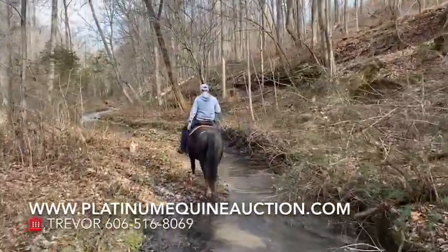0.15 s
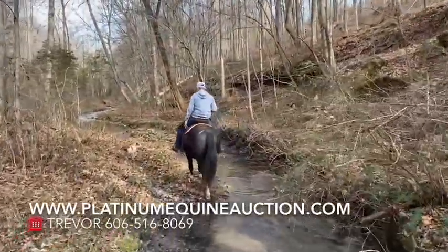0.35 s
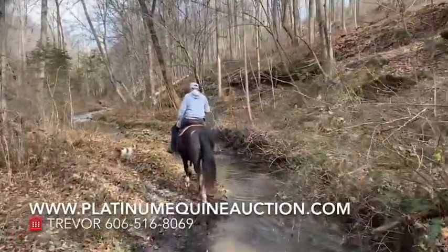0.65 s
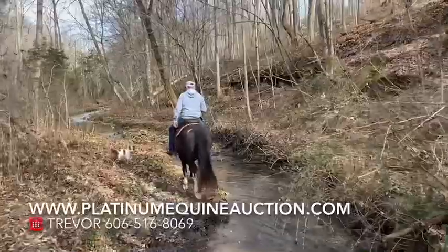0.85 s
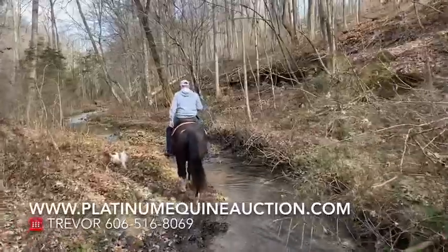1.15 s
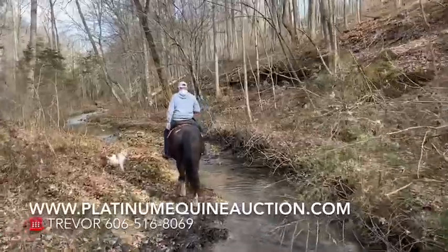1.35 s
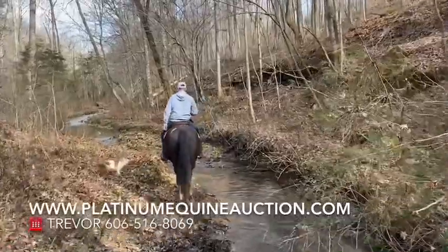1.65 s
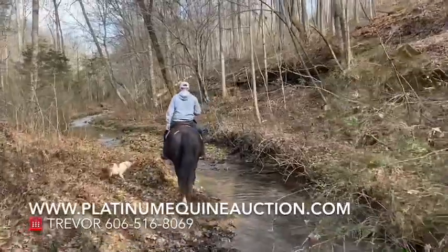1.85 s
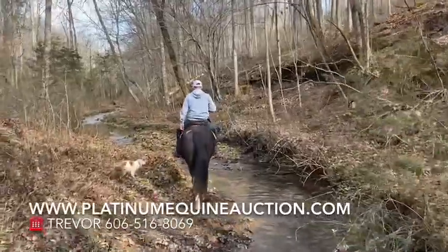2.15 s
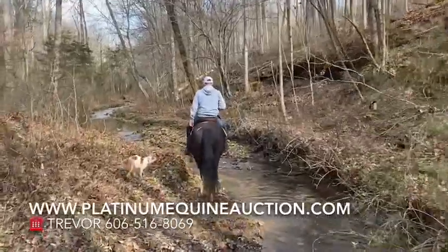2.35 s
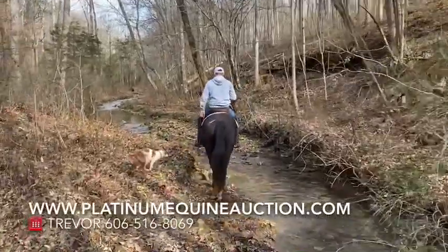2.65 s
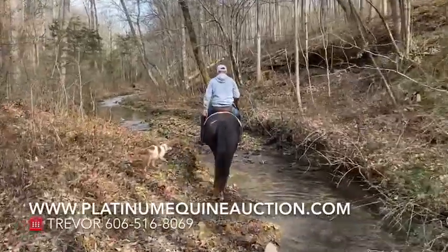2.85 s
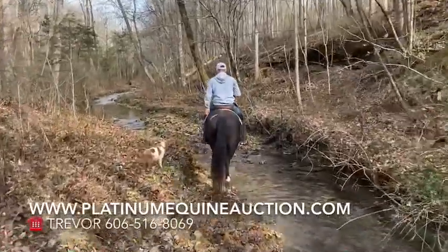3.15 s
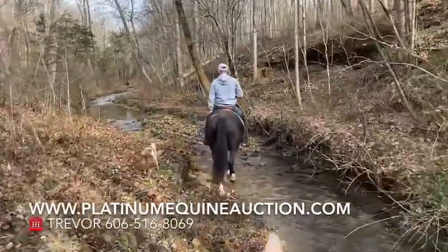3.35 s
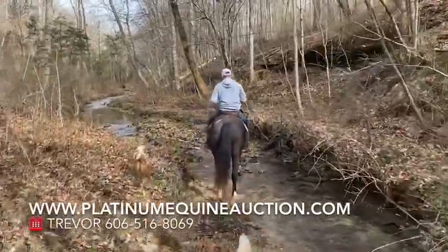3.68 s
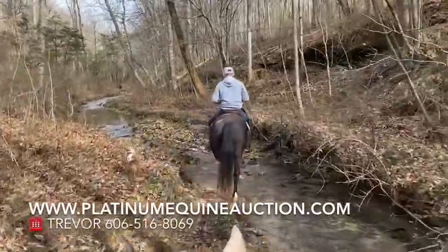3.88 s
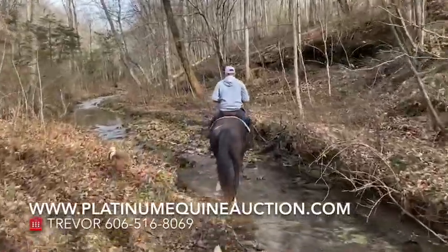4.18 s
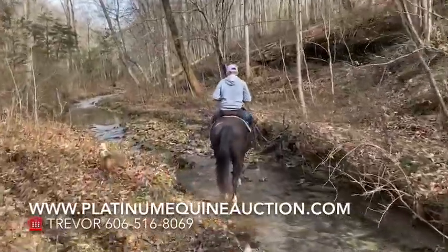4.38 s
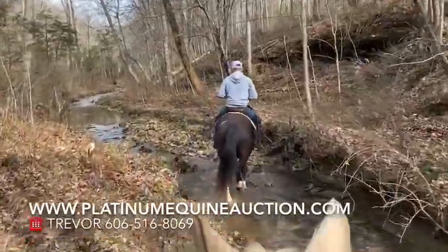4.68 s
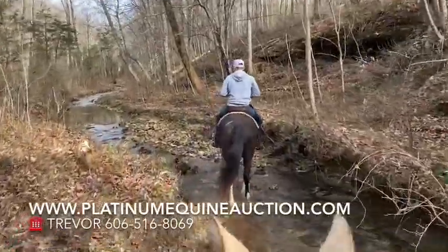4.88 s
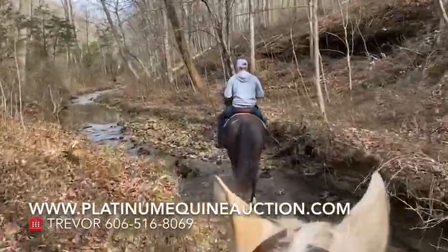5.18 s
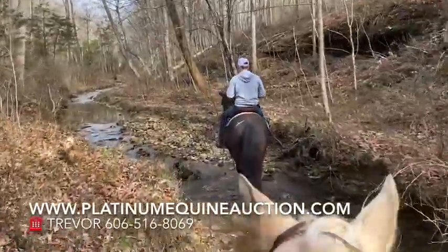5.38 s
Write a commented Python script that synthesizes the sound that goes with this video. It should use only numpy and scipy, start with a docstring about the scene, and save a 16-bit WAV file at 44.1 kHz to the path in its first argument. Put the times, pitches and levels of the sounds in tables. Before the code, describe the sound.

Horse hooves walk through a shallow creek, slapping, sloshing and gulping in the water, with droplets pinging and a faint distant engine drone.

```python
"""A shallow creek in bare woods: horses walk up it, heard from the saddle of the rear one.
Hooves slap the surface in noise and rings, trap air that gulps in gliding tones and thud on the bed.
Droplets ping; noise and bubble grains make the churning water, its spray and the current.
Low noise rumbles in the valley, where a far engine, one wavering tone, drones and sinks in pitch."""
import sys
import numpy as np
from scipy import signal
from scipy.fft import rfft, irfft, next_fast_len
from scipy.io import wavfile
from scipy.ndimage import map_coordinates

SR = 44100
rng = np.random.default_rng(int(sys.argv[2]) if len(sys.argv) > 2 else 0)


def waveform_to_disk(signal):
    """Save audio, clipped to [-1, 1], as 16-bit WAV at the path in sys.argv[1]."""
    frames = np.transpose(np.atleast_2d(signal))
    scaled = np.clip(frames, -1, 1) * 32767
    samples = np.round(scaled).astype(np.int16)
    wavfile.write(sys.argv[1], SR, samples)


N = 243431


def amp(db):
    """Amplitude of a level in dB."""
    return 10 ** (np.asarray(db) / 20)


def unit(x):
    """The signal scaled to rms 1."""
    return x / np.sqrt(np.mean(x ** 2) + 1e-20)


def along(points, hz):
    """Interpolates (Hz, value) points on a log frequency axis."""
    f, v = np.transpose(points)
    return np.interp(np.log(hz + 1), np.log(f + 1), v)


def curves(rows):
    """One value per sample for each column after the time."""
    s, *cols = np.transpose(rows)
    return [np.interp(np.arange(N) / SR, s, c) for c in cols]


def wobble(rate):
    """A smooth random curve, rate knots a second."""
    knots = rng.standard_normal(int(N * rate / SR) + 4)
    return map_coordinates(knots, [np.arange(N) * rate / SR])


def filtered(x, response):
    """Multiplies the spectrum of x by a response of frequency, complex where phase turns."""
    m = next_fast_len(N + SR // 2)
    return irfft(rfft(x, m) * response(np.fft.rfftfreq(m, 1 / SR)), m)[..., :N]


def add(track, s, sound):
    """Mixes a sound into the track from time s."""
    part = track[max(round(s * SR), 0):][:len(sound)]
    part += sound[:len(part)]


def band_noise(hz, octaves, size):
    """A short stretch of noise centred on hz; rms 1."""
    f = np.fft.rfftfreq(size, 1 / SR) + 1
    bell = np.exp(-.5 * (np.log2(f / hz) / octaves) ** 2)
    return unit(irfft(rfft(rng.standard_normal(size)) * bell, size))


def grains(count, mid_hz, octaves, cycles, spread_db, size):
    """Scattered short damped sines whose pitch rises a little, as bubbles do; rms 1."""
    place = rng.random(count)
    pitch_spread = rng.standard_normal(count)
    strength = np.minimum(rng.exponential(size=count), 4.5)
    hz = np.clip(mid_hz * 2 ** (octaves * pitch_spread), 100, SR / 3)[:, None]
    turns = hz * np.arange(size) / SR
    wave = np.sin(2 * np.pi * turns * (1 + 0.06654 * turns / cycles))
    wave *= turns * np.exp(-2.5 * turns / cycles)
    wave *= np.hanning(2 * size)[size:]  # fades to nothing at the grain's end
    wave *= amp(spread_db * strength)[:, None] * np.sqrt(hz)
    at = (place * N).astype(int)[:, None] + np.arange(size)
    return unit(np.bincount(at.ravel(), wave.ravel(), N + size)[:N])


def spread(pair, spectrum):
    """Colours two unrelated signals and mixes them into left and right of the given likeness; rms 1."""
    # Likeness of left and right: frequency_hz, correlation (1 = the same)
    likeness = [(100, 1), (300, 0.9733), (700, 0.7512), (1400, 0.2795), (3000, 0.9112), (5500, 0.8821),
                (9000, 0.84)]

    def response(hz):
        turn = np.arccos(np.clip(along(likeness, hz), -1, 1)) / 2
        return amp(along(spectrum, hz)) * [np.cos(turn), np.sin(turn)]

    mid, side = filtered(pair, response)
    return unit(np.array([mid + side, mid - side]))


def swell(s, db, rise_s, fall_s):
    """Power of an event that climbs to its peak and sinks, 10 dB in each given time (sign ignored)."""
    t = np.arange(N) / SR - s
    return amp(db - 10 * np.where(t < 0, -t / abs(rise_s), t / abs(fall_s))) ** 2


def effort():
    """Gains of gurgle, slosh and spray: the events add their power to the level between them."""
    # Water churning between heaves: time_s, gurgle_db, slosh_db
    churn = [(0, -51.5, -50.5), (1.38, -46, -50), (1.44, -45, -44), (1.58, -54, -50), (1.74, -49.5, -37),
             (1.94, -60.5, -47.5), (3.18, -51, -56.5), (3.28, -40, -46), (3.45, -49, -53.5),
             (3.7, -54, -57), (3.78, -40, -48), (3.95, -47.5, -54), (4.12, -59.5, -61.5), (4.38, -45, -56),
             (4.45, -47, -52.5), (4.55, -51.5, -52.5), (5.46, -54, -57), (5.52, -52, -54)]
    # Heaves round a leg: peak_s, gurgle_db, slosh_db, rise_s and fall_s (each per 10 dB, sign ignored)
    heaves = [(0.0, -49.5, -33.5, .1, 0.0616), (0.18, -40.5, -61.5, 0.527, -0.0275),
              (0.28, -25, -31.5, 0.0101, 0.03), (0.49, -38.5, -47.5, 0.1493, 0.1754),
              (0.58, -45.5, -37.5, 0.3575, 0.1253), (0.859, -36.5, -36.5, 0.1344, 0.0137),
              (1.105, -41.5, -48.5, 0.1658, 0.1424), (1.229, -33, -31.5, 0.0487, 0.0029),
              (1.425, -29.5, -34.5, 0.0398, 0.0153), (1.689, -39, -35, 0.08, 0.04),
              (1.89, -44.5, -48.5, 0.2087, 0.2185), (2.005, -32.5, -38, -0.0019, 0.0333),
              (2.078, -40.5, -38, 0.0883, 0.0423), (2.27, -37, -38.5, 0.0665, .04),
              (2.432, -40, -33.5, 0.1069, 0.0143), (2.54, -39.5, -40.5, 0.0148, 0.3741),
              (2.801, -48.5, -38.5, -0.1036, 0.1231), (2.885, -38, -43.5, 0.0157, 0.0791),
              (3.2, -40.5, -43, 0.0928, 0.0632), (3.252, -33.5, -52.5, 0.0109, -0.0064),
              (3.43, -45, -35.5, 0.0326, 0.0741), (3.335, -40, -41, 0.03, 0.03),
              (3.49, -42.5, -54.5, 0.1905, 0.0054), (3.602, -38, -33.5, 0.0451, 0.0972),
              (4.071, -38, -45.5, 0.14, 0.0187), (4.17, -43, -40.5, 0.0695, 0.0807),
              (4.33, -40, -43, 0.0479, 0.1045), (4.398, -36, -52.5, 0.0218, 0.0164),
              (4.567, -40, -44, 0.0622, 0.0164), (4.724, -38.5, -37, 0.0428, 0.058),
              (4.77, -42.5, -46, 0.0296, 0.2541), (5.145, -39, -42.5, 0.0514, 0.1276),
              (5.408, -31, -35, 0.016, 0.016)]
    # Drops falling between splashes: time_s, level_db
    patter = [(0, -54), (1.2, -54.5), (2.4, -49), (2.9, -53.5), (3.9, -50.5), (4.1, -53), (4.4, -48.5),
              (4.52, -56), (5.36, -53.5), (5.42, -47.5), (5.52, -49)]
    # Sheets of spray thrown by the legs: peak_s, level_db, rise_s and fall_s (each per 10 dB, sign ignored)
    splashes = [(0.2, -54.5, 1.0972, 0.3772), (0.23, -41.5, 0.0589, .5), (0.46, -44.5, 0.35, 0.0594),
                (0.78, -44, .5, 0.5564), (1.291, -40, 0.1194, 0.205), (1.43, -42, 0.2037, -0.2281),
                (1.611, -44.5, 0.0286, 0.2131), (1.89, -42.5, 0.0938, 0.1961), (1.95, -43.5, 0.0604, 0.05),
                (2.0, -43, 0.0897, 0.1069), (2.2, -47.5, -0.1419, 0.1139), (2.518, -38, -0.0079, 0.0942),
                (2.58, -46, 0.0615, 0.3), (3.0, -51, 0.4942, -0.1618), (3.14, -44, 0.1626, 0.3507),
                (3.332, -38, 0.0349, 0.0463), (3.634, -38, 0.008, 0.03), (3.736, -41, 0.0329, 0.1373),
                (4.007, -38, 0.0143, 0.0474), (4.334, -37, 0.0303, 0.0167), (4.55, -49, 0.0832, 0.113),
                (4.72, -43, 0.0024, 0.0986), (4.93, -46, 0.102, 0.0064), (5.114, -40, -0.0115, 0.1239),
                (5.338, -44, 0.02, 0.07), (5.39, -34.5, 0.0064, 0.0002)]
    gurgle_db, slosh_db = curves(churn)
    gurgle = amp(gurgle_db) ** 2 + sum(swell(s, db, rise, fall) for s, db, _, rise, fall in heaves)
    slosh = amp(slosh_db) ** 2 + sum(swell(s, db, rise, fall) for s, _, db, rise, fall in heaves)
    spray = amp(curves(patter)[0]) ** 2 + sum(swell(*row) for row in splashes)
    return np.sqrt([gurgle, slosh, spray])


def water():
    """Legs churn the creek into slosh, gurgle and a fizz of spray, over the current's steady trickle."""
    # Colours of the gurgle, slosh, spray and current: frequency_hz, relative_level_db
    gurgle_colour = [(200, -13), (330, -3), (500, -1), (800, -3.5), (1200, -9), (1800, -16), (2800, -15),
                     (4500, -49.5)]
    slosh_colour = [(70, -29.5), (130, -5), (200, -0.5), (290, 3), (400, -9.5), (600, -48.5)]
    spray_colour = [(500, -55.5), (1200, -4), (2000, -4.5), (4000, -4), (5800, -5), (7200, -3),
                    (9000, -4.5), (12000, -14.5), (16000, -24)]
    current_colour = [(150, -18.5), (400, -4), (900, -6), (1600, -21), (3000, -17.5), (8000, -13.5),
                      (12000, -23), (16000, -43.5)]
    drip_colour = [(500, -15.0), (1200, 1.5), (4000, -1.5), (8000, -13.5)]
    # Level of the spray's top treble: time_s, extra_db
    fine_spray = [(0, 2.5), (1, 1.5), (2, 0), (2.8, 2), (3.3, -5), (4.4, -6), (5.52, -3)]
    gurgle_gain, slosh_gain, spray_gain = effort()

    bubbles = [grains(count=5500, mid_hz=750, octaves=1.1, cycles=4, spread_db=1.7, size=700)
               for _ in "ab"]
    gurgle = spread(np.array(bubbles) + 0.5 * rng.standard_normal((2, N)), gurgle_colour)
    slosh = spread(rng.standard_normal((2, N)), slosh_colour)

    drops = [grains(count=9000, mid_hz=3300, octaves=1.05, cycles=2.5, spread_db=2.3, size=140)
             for _ in "ab"]
    spray = spread(0.75 * np.array(drops) + rng.standard_normal((2, N)), spray_colour)
    treble = filtered(spray, lambda hz: 1 / (1 + (6000 / (hz + 1)) ** 4))
    spray = spray + (amp(curves(fine_spray)[0]) - 1) * treble

    surge = wobble(35)  # the layers jump together as water breaks
    low = amp(2.031 * surge) * (gurgle_gain * gurgle + slosh_gain * slosh)
    flicker_db = 0.729 * surge + 1.3846 * wobble(60) + 0.9924 * wobble(16)
    high = spray_gain * amp(flicker_db) * spray

    # falling drops leave small ringing bubbles, whose level follows the spray's
    drips = [grains(count=4000, mid_hz=1800, octaves=.75, cycles=6, spread_db=1.8, size=700)
             for _ in "ab"]
    high += 0.4 * spray_gain * spread(np.array(drips), drip_colour)
    current = amp(-54.0) * spread(rng.standard_normal((2, N)), current_colour)
    return low + high + current


def valley():
    """A low rumble, and a far engine whose tone wavers on its way through the air."""
    # Far engine, before it wavers: time_s, pitch_hz, level_db (rms)
    engine = [(2.0, 93.09, -69.5), (2.6, 85.76, -45.5), (3.1, 81.1, -50.5), (3.6, 77.31, -46.5),
              (4.0, 76.26, -43.5), (4.25, 72.67, -51), (4.5, 69.89, -46), (5.0, 66.63, -42.5),
              (5.3, 62.14, -43), (5.52, 60.17, -44)]
    # Low air of the valley: frequency_hz, relative_level_db
    rumble_colour = [(15, -39), (30, -15), (55, -0.5), (95, -0.5), (140, -5.5), (230, -10.5), (400, -61.5)]
    hz, db = curves(engine)
    wavering_hz = hz * (1 + 0.02453 * wobble(10))
    tone = np.sqrt(2) * np.sin(2 * np.pi * np.cumsum(wavering_hz) / SR)
    gusts_db = 1.6 * wobble(6)
    drone = amp(db + 1.935 * wobble(4.6984)) * tone
    rumble = amp(-46.5 + gusts_db) * spread(rng.standard_normal((2, N)), rumble_colour)
    return drone + rumble


def pockets():
    """Each pocket swells and dies in a few cycles, its pitch sliding as the cavity opens or closes."""
    # Air under the hooves: loudest_s, pitch_hz (mid-slide), level_db (peak of the tone),
    # cycles (twice the fall to half strength), glide_octaves (whole slide)
    air_pockets = [(0.006, 274.7, -33, 7.054, 0.1474), (0.037, 286.6, -34, 12.508, 0.3895),
                   (0.073, 268.7, -25.5, 3.2, -0.3978), (0.073, 532.1, -28.5, 4.5, 0.1264),
                   (0.099, 922.8, -30.5, 3.1, -0.4615), (0.147, 353.4, -32, 5, 0.297),
                   (0.224, 645.3, -28, 3.73, 0.777), (0.232, 163.2, -24.5, 1.6674, -0.262),
                   (0.249, 927.6, -18.5, 1.619, 0.213), (0.255, 470.2, -22, 2.52, -0.278),
                   (0.261, 703.3, -19.5, 5.2, 0.58), (0.277, 559.5, -19, 3.8, -0.8948),
                   (0.279, 905.3, -22.5, 5.28, 0.13), (0.286, 576.5, -18.5, 3.5, 0.0102),
                   (0.296, 598.6, -25.5, 2.62, -0.093), (0.323, 371.1, -26, 3.1, -1.1398),
                   (0.331, 902, -29.5, 3.8, 0.299), (0.339, 964.6, -26, 3.278, 0.14),
                   (0.377, 646, -28.5, 2.514, 0.154), (0.409, 797.4, -28, 5.1, 0.498),
                   (0.451, 1172, -28, 5.959, -0.6918), (0.463, 429, -34.5, 1.453, -0.16),
                   (0.51, 840.8, -27, 2.58, 0.0174), (0.511, 603.2, -25.5, 4, -0.0186),
                   (0.514, 310.9, -17, 1.9097, 0.35), (0.569, 274.5, -25.5, 3.159, -0.0936),
                   (0.78, 257.9, -33, 2.5, -0.0071), (0.804, 449.5, -28.5, 2.024, -0.241),
                   (0.818, 248.3, -28, 3.176, 0.519), (0.8275, 987.3, -25, 1.92, -0.368),
                   (0.835, 770.3, -23.5, 8.847, -0.02), (0.836, 355.7, -20.5, 9.306, 0.1147),
                   (0.856, 320.6, -13, 3.07, 0.0814), (0.858, 646.8, -26, 3, -0.1364),
                   (0.867, 311, -15.5, 2.675, -0.06), (0.884, 1420, -35.5, 2.32, -0.129),
                   (0.89, 1057, -29, 5.4, 0.938), (0.892, 582.9, -24.5, 3.932, 0.2665),
                   (0.902, 893.1, -26, 4.5, -0.14), (0.909, 1295, -23, 2.567, 0.321),
                   (1.075, 948.1, -35, 13, 0.3863), (1.099, 419.5, -18.5, 2.283, -0.2843),
                   (1.108, 400, -25, 3.5, 0.0437), (1.127, 382, -30.5, 5.779, -0.0477),
                   (1.142, 1063, -27.5, 1.795, 0.121), (1.194, 297.1, -25, 2.552, 0.1565),
                   (1.206, 2500, -33, 11.226, 0.5986), (1.218, 897.8, -27, 2.0656, -0.0166),
                   (1.2235, 825.4, -21, 1.801, 0.1635), (1.229, 261.3, -19.5, 2.6, -0.7558),
                   (1.275, 1328, -24.5, 2.121, 0.152), (1.3285, 683.7, -33, 3.306, 0.136),
                   (1.366, 561.1, -21.5, 4.5, -0.5192), (1.391, 1380, -18, 1.7098, 0.263),
                   (1.395, 730.3, -24.5, 5.377, 0.1328), (1.422, 267.4, -29.5, 3.833, 0.3972),
                   (1.42, 768.3, -24, 3.159, 0.017), (1.428, 700.7, -24, 5.294, -0.7145),
                   (1.442, 114.4, -23, 2.431, -1.087), (1.493, 520.3, -27.5, 1.4714, -0.046),
                   (1.656, 572.5, -30, 8.01, 0.0882), (1.671, 214.9, -23, 4.181, 0.6565),
                   (1.695, 312.4, -23.5, 5.058, 0.0947), (1.724, 280.5, -32.5, 6.625, -0.46),
                   (1.749, 282.7, -27.5, 4.1, 0.1846), (1.768, 88.36, -19, 2.336, 0.067),
                   (1.816, 320, -26, 5.11, 0.662), (1.9731, 980.4, -23.5, 2.022, -0.451),
                   (1.977, 350.3, -16, 1.6682, -0.188), (1.9985, 1109, -29.5, 2.09, -0.66),
                   (2.001, 756.2, -23.5, 5.467, -0.0035), (2.013, 381.7, -24, 6.399, -0.0343),
                   (2.029, 1079, -35.5, 3.5, 0.218), (2.066, 390.1, -18, 1.6788, -0.3907),
                   (2.082, 711.9, -27, 2.74, 0.04), (2.141, 641.9, -31, 3.097, 0.065),
                   (2.2045, 653.3, -31, 4.5, -0.0495), (2.246, 1020, -28, 1.506, -0.271),
                   (2.252, 608.4, -28, 4, 0.05), (2.26, 563.1, -24, 5.4, 0.3554),
                   (2.272, 404.6, -23, 2.443, -0.2426), (2.281, 326.9, -20, 3.08, 0.141),
                   (2.347, 75.31, -25, 3.614, 0.3266), (2.3866, 777.4, -32.5, 5, -0.1743),
                   (2.42, 290.7, -23.5, 4.4, 0.6468), (2.537, 769.5, -22.5, 1.578, 0.086),
                   (2.544, 174.2, -20.5, 1.4544, -0.5423), (2.568, 816.7, -26.5, 3.7, -0.0513),
                   (2.573, 434.4, -29, 11.967, 0.094), (2.595, 1133, -32.5, 5, 0.116),
                   (2.603, 332.9, -29.5, 8.707, -0.797), (2.662, 529.3, -27.5, 4.1, 0.2364),
                   (2.665, 854.2, -27, 4.29, -0.063), (2.716, 435.1, -27.5, 1.714, -0.042),
                   (2.794, 912, -36.5, 7.065, 0.1424), (2.799, 248.8, -28.5, 2.388, -0.064),
                   (2.813, 333.4, -31, 2.578, 0.0737), (2.852, 448.7, -28.5, 2.026, 0.035),
                   (2.866, 794.7, -32.5, 7.9, 0.089), (2.881, 497.3, -31, 2.764, -0.0994),
                   (2.897, 894.1, -36, 7.2, -0.1694), (2.898, 445.5, -33.5, 4, -0.0062),
                   (2.917, 746.3, -35.5, 6.916, -0.093), (3.0712, 1314, -37, 5, 0.0886),
                   (3.201, 168.7, -20, 1.8082, -0.256), (3.182, 482.3, -33, 6.24, -0.304),
                   (3.2213, 650, -22.5, 2.4, -0.5), (3.2495, 622.2, -19.5, 4.2, 0.2865),
                   (3.284, 1112, -36, 4.38, 0.2827), (3.2875, 651, -30.5, 1.562, -0.096),
                   (3.32, 387.2, -27.5, 4.0, -0.0717), (3.341, 1119, -38, 4, -0.0052),
                   (3.395, 329, -35.5, 7.156, 0.5577), (3.416, 269.3, -22, 2.61, -0.087),
                   (3.417, 903.9, -34.5, 5.506, 0.0064), (3.438, 891.9, -35.5, 4.02, -0.043),
                   (3.448, 434.7, -29.5, 1.705, 0.038), (3.4566, 866.6, -34, 4, -0.266),
                   (3.489, 553, -23, 1.4773, 0.183), (3.588, 515.1, -26.5, 3.8, -0.126),
                   (3.601, 614.1, -25.5, 5.75, 0.537), (3.619, 284.7, -30.5, 4.1, 0.24),
                   (3.625, 1256, -31, 4, 0.0077), (3.642, 432.7, -27.5, 1.287, 0.1685),
                   (3.651, 211.6, -25, 2.682, -0.597), (3.698, 253.3, -32, 5.5, 0.65),
                   (3.739, 745.6, -26, 4.8, 0.271), (3.741, 256.4, -19.5, 1.693, -0.366),
                   (3.811, 640.9, -31, 2.524, -0.186), (3.813, 432.5, -27, 1.5545, 0.0036),
                   (3.84, 329, -35, 2.5, -0.0725), (3.876, 682.9, -33.5, 4, 0.202),
                   (3.886, 1280, -33.5, 4, 0.0079), (3.92, 1925, -33, 5.98, -0.0028),
                   (3.9235, 870.6, -31, 4, -0.0676), (3.925, 1493, -34, 7.753, 0.358),
                   (3.931, 2102, -30, 5.207, -0.0596), (3.957, 298.4, -33, 2.0246, -0.069),
                   (4.017, 1158, -33.5, 7.076, -0.0964), (4.015, 618.9, -33.5, 3.085, -0.031),
                   (4.064, 1184, -39, 5.67, 0.016), (4.071, 330.6, -32.5, 2.023, 0.02),
                   (4.15, 308.3, -31, 5.874, -0.4205), (4.158, 485.5, -28, 1.616, -0.082),
                   (4.173, 661.3, -26.5, 3.9966, -0.315), (4.176, 241.7, -31.5, 2.014, -0.3216),
                   (4.212, 168.8, -33, 2.459, 0.312), (4.245, 288.7, -37, 4, 0.1226),
                   (4.325, 541.9, -24, 1.8237, 0.114), (4.329, 280.8, -21, 1.7844, -0.219),
                   (4.346, 1137, -30, 3.35, 0.0575), (4.397, 717.2, -21.5, 6.404, 0.2202),
                   (4.561, 421.7, -28, 1.765, -0.066), (4.668, 648.8, -33.5, 5, 0.321),
                   (4.686, 776, -29, 2.911, 0.399), (4.7046, 602.2, -27.5, 1.2777, 0.0018),
                   (4.718, 1491, -25.5, 4.64, -0.2007), (4.719, 609, -23, 1.861, -0.089),
                   (4.73, 171.1, -26, 3.8, 0.228), (4.742, 1449, -36.5, 5.758, 0.0234),
                   (4.777, 1142, -35.5, 8.275, 0.086), (4.792, 1194, -35, 5.24, -0.029),
                   (5.147, 909.6, -30.5, 2.543, -0.038), (5.157, 1250, -38, 12, -0.11),
                   (5.2996, 646.7, -31.5, 2.938, -0.05), (5.396, 1198, -30, 11.43, -0.23),
                   (5.4, 632.7, -27.5, 9.07, 0.0746), (5.411, 731.7, -27, 6.077, 0.315),
                   (5.413, 188.5, -17.5, 2.73, -0.1521), (5.389, 900, -28, 1.6, 0),
                   (5.427, 617.4, -31, 1.361, 0.315)]
    out = np.zeros(N)
    for s, hz, db, cycles, glide in air_pockets:
        half = cycles / hz / 2  # seconds from the peak down to half strength
        t = np.arange(-2 * half, 4 * half, 1 / SR)
        rise = .5 ** ((t / (0.6204 * half)) ** 2)
        fall = .5 ** ((np.abs(t) / half) ** 1.3613)
        shape = np.where(t < 0, rise, fall)
        pitch = hz * 2 ** (glide * np.tanh(t / (0.991 * half)) / 2)
        tone = np.sin(2 * np.pi * (np.cumsum(pitch) / SR + rng.random()))
        # torn water around the pocket roughens its note
        torn = .12 * band_noise(1.3 * hz, octaves=.8, size=2 * len(t))[:len(t)]
        add(out, s + t[0], amp(db) * shape * (tone + torn))
    return out


def banks(x):
    """Banks and trunks scatter echoes in which each frequency dies at its own speed."""
    # Decay of the echoes: frequency_hz, t60_s
    echo_decay = [(200, 0.02776), (1500, 0.1318), (8000, 0.0126)]
    hz, t, z = signal.stft(rng.standard_normal((2, SR // 4)), SR, nperseg=256)
    fade = amp(-60 * t / along(echo_decay, hz)[:, None])
    tail = signal.istft(z * fade, SR, nperseg=256)[1]
    high = filtered(x, lambda f: 1 / (1 + (350 / (f + 1)) ** 2))  # the echoes are thin in the lows
    delayed = np.pad(high, (100, 0))[None]  # in samples
    return signal.fftconvolve(delayed, tail / np.linalg.norm(tail[0]), axes=1)[:, :N]


def droplets():
    """Each droplet falling back leaves a tiny bubble that starts fast and rings for a few cycles."""
    # Pings: time_s (a quarter of width_ms after the peak), pitch_hz (at the peak), level_db (peak),
    # width_ms (twice the fall to half strength)
    pings = [(0.0987, 3391, -38, 1.8), (0.1598, 2577, -36.5, 1.8), (0.2295, 2177, -35.5, 3.16),
             (0.2458, 6592, -37.5, 1.8), (0.2464, 7521, -31, 1.75), (0.2753, 1462, -31, 5.36),
             (0.2827, 3911, -29.5, 2.292), (0.293, 1633, -25.5, 1.6774), (0.3106, 4791, -31, 2.26),
             (0.3118, 3660, -36, 1.846), (0.3303, 3021, -32, 4.072), (0.3492, 7695, -35.5, 1.83),
             (0.3549, 7117, -33.5, 1.747), (0.36, 3764, -34.5, 1.904), (0.4118, 7452, -32.5, 2.1),
             (0.4268, 1671, -35, 2.9), (0.439, 3564, -38.5, 1.8), (0.4616, 2285, -44.5, 1.87),
             (0.4624, 8043, -36.5, 2.04), (0.4633, 5106, -32.5, 1.997), (0.4649, 4309, -34.5, 1.7),
             (0.4779, 2719, -39, 1.8), (0.6563, 4438, -34.5, 1.971), (0.7564, 5084, -29, 1.187),
             (0.8003, 4587, -32.5, 1.961), (0.8012, 3181, -29, 1.8), (0.884, 2762, -37, 1.8),
             (0.8849, 1373, -31, 1.825), (0.9074, 2672, -32, 1.8), (0.9106, 3803, -40, 2.735),
             (0.9259, 7350, -33.5, 1.8), (0.9273, 2952, -34, 1.8), (0.9418, 2073, -30.5, 1.5247),
             (1.084, 2505, -34, 1.8), (1.2038, 2017, -37.5, 1.87), (1.2749, 2826, -28, 1.8),
             (1.2874, 3682, -36.5, 1.8), (1.2916, 6903, -41.5, 1.87), (1.3115, 4977, -37.5, 3.39),
             (1.3236, 7207, -30.5, 2.04), (1.332, 4954, -35.5, 1.858), (1.3835, 4903, -33, 1.732),
             (1.391, 2780, -30, 1.8), (1.3945, 3745, -34.5, 1.8), (1.412, 2442, -23, 1.8),
             (1.425, 2027, -25.5, 1.997), (1.4247, 3396, -30.5, 3.09), (1.434, 7090, -33, 1.864),
             (1.4343, 2749, -28, 1.8), (1.4632, 3491, -38, 1.8), (1.8064, 2682, -37.5, 1.701),
             (1.8648, 3531, -37.5, 1.8), (1.8729, 4930, -30, 1.541), (1.9506, 2598, -42, 3.38),
             (1.9718, 2745, -23.5, 1.8), (2.0812, 1431, -33, 1.929), (2.2025, 4849, -36.5, 2.064),
             (2.217, 3060, -37, 1.8), (2.4984, 5048, -31, 1.666), (2.5202, 6154, -37.5, 1.792),
             (2.5249, 2923, -24.5, 1.8), (2.5367, 4524, -28.5, 1.857), (2.5752, 7094, -36, 1.641),
             (2.5777, 1438, -38, 3.255), (2.6011, 2488, -37, 1.8), (2.6038, 1434, -35, 1.951),
             (2.7478, 2489, -37, 1.8), (3.2466, 2612, -33.5, 1.75), (3.271, 2793, -36, 1.8),
             (3.3288, 1879, -28, 2.044), (3.33, 7313, -37, 1.93), (3.3457, 2318, -28, 2.5),
             (3.6325, 7483, -30.5, 1.46), (3.6418, 1381, -33.5, 1.914), (3.6422, 2285, -39.5, 5.41),
             (3.737, 3938, -40, 1.8), (4.0052, 1943, -39.5, 2.5), (4.0119, 3446, -39.5, 1.8),
             (4.0193, 3466, -36.5, 2.226), (4.3233, 3909, -30.5, 1.943), (4.3413, 2323, -32, 2.11),
             (4.3421, 3017, -35.5, 4.478), (5.1031, 2274, -39.5, 1.65), (5.1103, 6960, -35.5, 1.818),
             (5.1102, 7763, -34.5, 2.2), (5.101, 1051, -33.5, 2.865), (5.1245, 1299, -29, 1.928),
             (5.1286, 2536, -30.5, 1.716), (5.1369, 2355, -36.5, 3.72), (5.1387, 1466, -37, 2.54),
             (5.1418, 3587, -36, 1.8), (5.388, 4986, -31.5, 1.736), (5.3877, 6912, -35.5, 2.117),
             (5.3883, 2251, -27, 1.8), (5.3966, 3890, -25.5, 1.901)]
    climb_octaves = 0.08394  # whole slide, of which a ping starts partway
    out = np.zeros(N)
    for s, hz, db, ms in pings:
        half = abs(ms) / 2000  # seconds from the peak down to half strength
        t = np.arange(-half, 5 * half, 1 / SR)
        rise = .5 ** ((t / (0.5008 * half)) ** 2)
        fall = .5 ** ((np.abs(t) / half) ** 0.8043)
        shape = np.where(t < 0, rise, fall)
        pitch = hz * 2 ** (climb_octaves * np.tanh(t / half) / 2)
        tone = np.sin(2 * np.pi * (np.cumsum(pitch) / SR + rng.random()))
        add(out, s + t[0] - half / 2, amp(db) * shape * tone)
    return out


def slaps():
    """A sharp crack and the crater's brief ring, in a puff of noise near its pitch that leaves a wash."""
    # Water slapped by hooves and large drops: start_s, level_db (scales the mix below), ring_hz, puff_t60_s
    surface_hits = [(0.2101, -36, 2218, 0.0134), (0.2325, -26, 3046, 0.01), (0.2772, -23.5, 1516, 0.0176),
                    (0.402, -30, 1597, 0.01422), (0.4624, -20.5, 6864, 0.017), (0.6557, -27, 3714, 0.0155),
                    (0.756, -36.5, 5102, 0.01358), (0.7992, -19, 2029, 0.032), (0.847, -26.5, 1580, 0.0144),
                    (0.906, -26, 1496, 0.01217), (0.9254, -32.5, 2231, 0.01151),
                    (1.254, -34, 7228, 0.01965), (1.3634, -24, 2262, 0.01464), (1.3895, -21, 1591, 0.01275),
                    (1.41, -22.5, 2061, 0.0272), (1.805, -36, 2617, 0.01452), (1.8639, -26, 4914, 0.0207),
                    (1.9722, -20.5, 2648, 0.01225), (2.136, -24.5, 2185, 0.0246),
                    (2.185, -29.5, 3532, 0.0163), (2.2004, -28.5, 2996, 0.0284),
                    (2.484, -26.5, 6798, 0.0151), (2.4934, -27.5, 2747, 0.01558),
                    (2.524, -21, 4281, 0.01002), (2.632, -32.5, 4144, 0.01425), (3.244, -30, 1539, 0.0113),
                    (3.3136, -29, 1496, 0.0304), (3.3292, -22, 3051, 0.0153), (3.3285, -25, 7425, 0.01655),
                    (3.632, -25, 8080, 0.01052), (3.6322, -19.5, 3565, 0.0095), (3.734, -24, 1773, 0.01375),
                    (3.7663, -21.5, 1648, 0.01807), (4.0036, -31.5, 3449, 0.01183),
                    (4.3216, -23, 1817, 0.01235), (4.366, -25.5, 2162, 0.02767),
                    (4.3892, -30, 1782, 0.01462), (4.4614, -27.5, 1971, 0.01788),
                    (4.704, -28.5, 2870, 0.0095), (4.717, -20, 1488, 0.02465),
                    (4.9165, -30.5, 1760, 0.0132), (5.1089, -26, 7615, 0.01362),
                    (5.1111, -21.5, 3064, 0.01096), (5.3342, -34, 4498, 0.011162),
                    (5.3869, -16, 3794, 0.0113), (5.387, -25.5, 7553, 0.01216),
                    (5.4238, -29, 3297, 0.01446)]
    out, t = np.zeros(N), np.arange(SR // 8) / SR
    rise = 1 - np.exp(-t / .0003)
    for s, db, hz, t60 in surface_hits:
        crack = .8 * amp(-60 * t / .005) * band_noise(min(hz, 6000), octaves=.9, size=len(t))
        ring = 0.8949 * amp(-60 * t / 0.008356) * np.sin(2 * np.pi * hz * t)
        puff_and_wash = 0.18965 * amp(-60 * t / t60) + 0.0674 * amp(-60 * t / 0.1155)
        puff = puff_and_wash * band_noise(hz, octaves=0.3711, size=len(t))
        add(out, s, amp(db) * rise * (crack + ring + puff))
    return out


def thuds():
    """Hooves meet the creek bed: a soft, low push into the mud and gravel, a fading sine."""
    # Hooves on the bed: start_s, level_db (peak of the envelope), pitch_hz
    bed_hits = [(0.614, -34, 125.1), (0.8, -33.5, 140.5), (1.498, -27.5, 114), (1.548, -33, 110.5),
                (1.969, -28.5, 165), (2.067, -30.5, 121.3), (2.377, -27, 134.2), (2.669, -27, 92.26),
                (2.7, -29.5, 98.78), (2.94, -30, 122), (3.328, -29.5, 118.6), (3.58, -29.5, 106.9),
                (3.737, -26.5, 94.78), (4.185, -34, 138.2), (4.32, -33, 94.55), (4.552, -38, 78.5),
                (5.2, -29.5, 90.32)]
    t60_s, rise_s = 0.08132, 0.01133
    out, t = np.zeros(N), np.arange(SR // 4) / SR
    shape = amp(-60 * t / t60_s) * (1 - np.exp(-t / rise_s))
    for s, db, hz in bed_hits:
        add(out, s, amp(db) * shape / shape.max() * np.sin(2 * np.pi * hz * t))
    return out


def note():
    """A brief hollow tone from the water, one sine that sags in pitch after a step."""
    # Low note: time_s, pitch_hz, level_db (peak)
    sagging_note = [(4.71, 200.3, -71), (4.735, 198.3, -43), (4.8, 189.1, -35), (4.83, 186.7, -46),
                    (4.86, 176.7, -75)]
    hz, db = curves(sagging_note)
    return amp(db) * np.sin(2 * np.pi * np.cumsum(hz) / SR)


def scene():
    """Steps, their echoes, the water and the valley."""
    steps = pockets() + thuds() + slaps() + droplets() + note()
    echoes = amp(-11) * banks(steps)
    return steps + echoes + water() + valley()


def record(dry):
    """Left and right differ in level and phase by frequency; the top of the band is cut."""
    # Balance of left and right: frequency_hz, left_louder_db
    left_louder = [(60, 0.5), (110, -0.5), (200, -0.5), (380, 3), (700, 6), (1290, 6.5), (2380, 6),
                   (4400, 6), (8120, 0.5), (15000, -0.5)]
    # Phase between left and right, stepping down through the treble: frequency_hz, left_lead_radians
    left_lead = [(20, 0), (430, .4), (1120, .2), (2670, .5), (3530, .1), (7500, -.1), (8700, -3.1),
                 (9600, -3.2), (10400, -6.1), (11600, -6.3), (12500, -9.3), (13800, -9.5), (14500, -12.6)]
    top_hz = 15800  # nothing passes from here up
    side = np.array([[.5], [-.5]])  # each channel takes half the difference

    def left_and_right(hz):
        level = amp(side * along(left_louder, hz))
        phase = np.exp(1j * side * along(left_lead, hz))
        return level * phase * (hz < top_hz)

    return filtered(dry, left_and_right)


dry = scene()
out = record(dry)
waveform_to_disk(out)
```